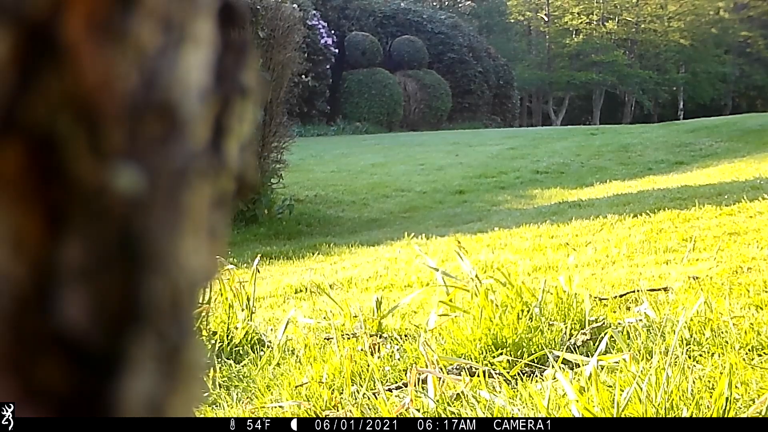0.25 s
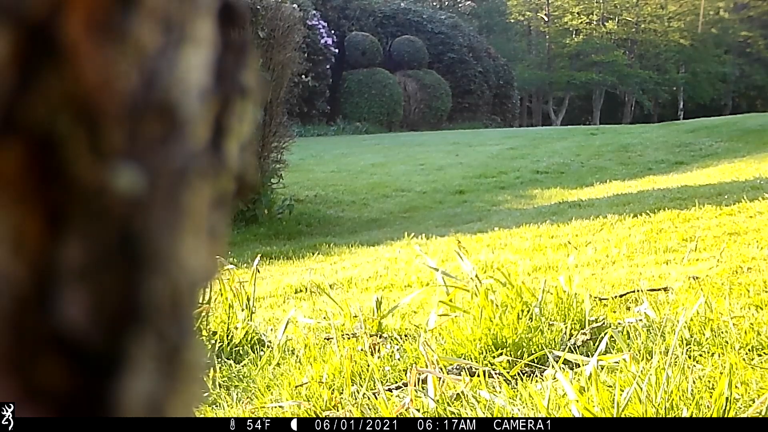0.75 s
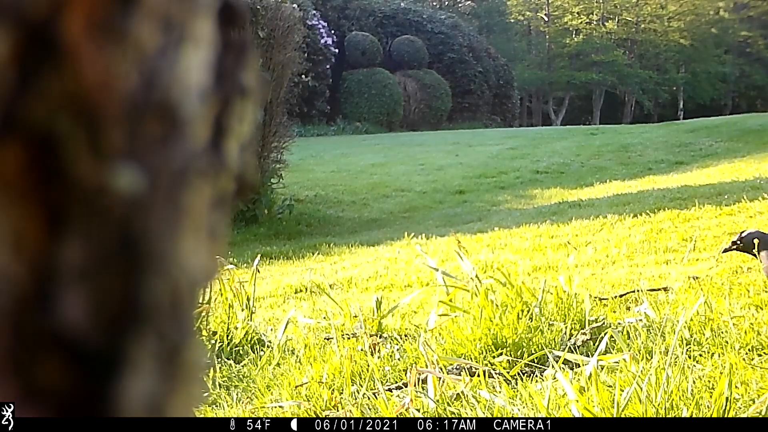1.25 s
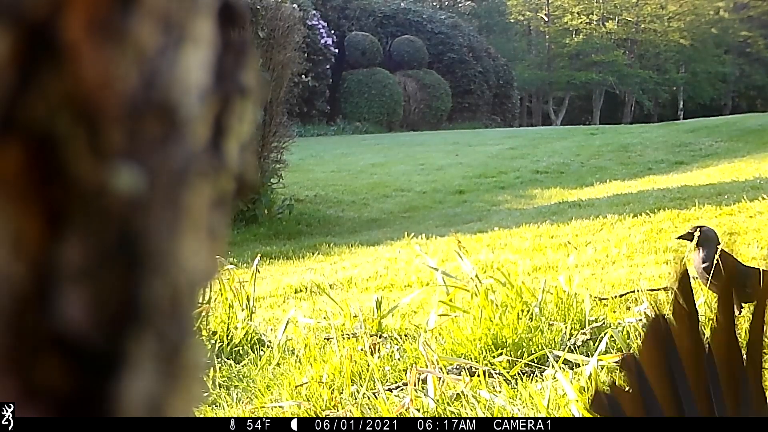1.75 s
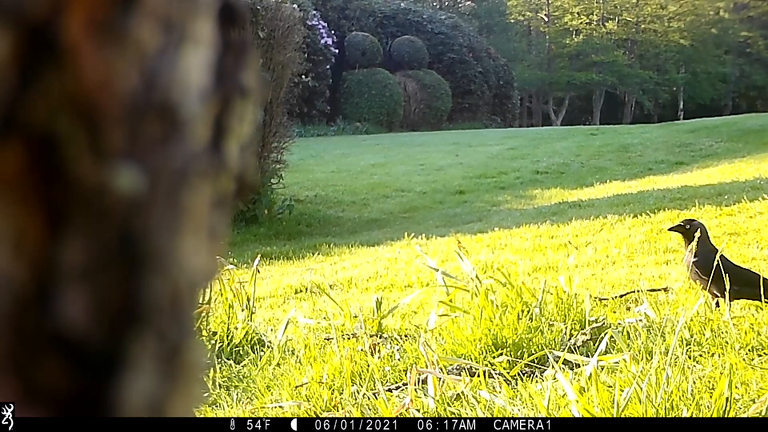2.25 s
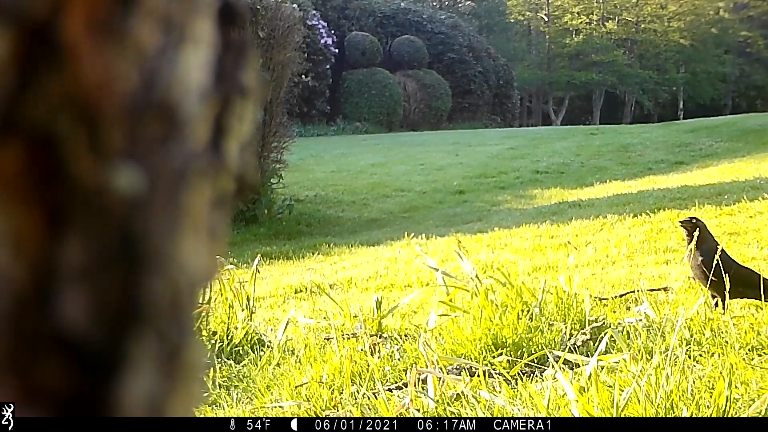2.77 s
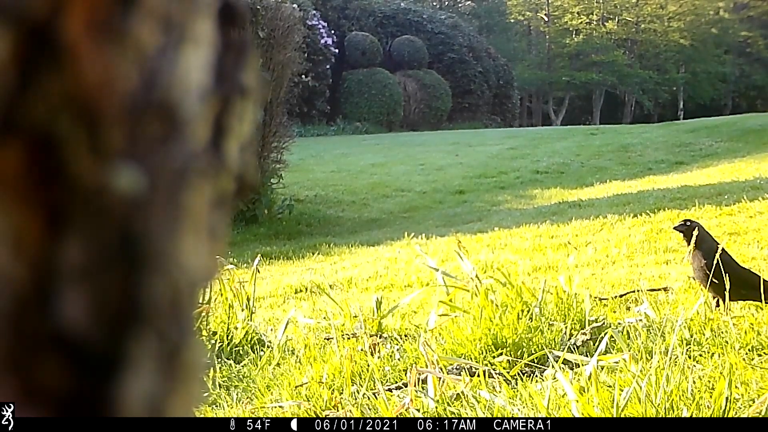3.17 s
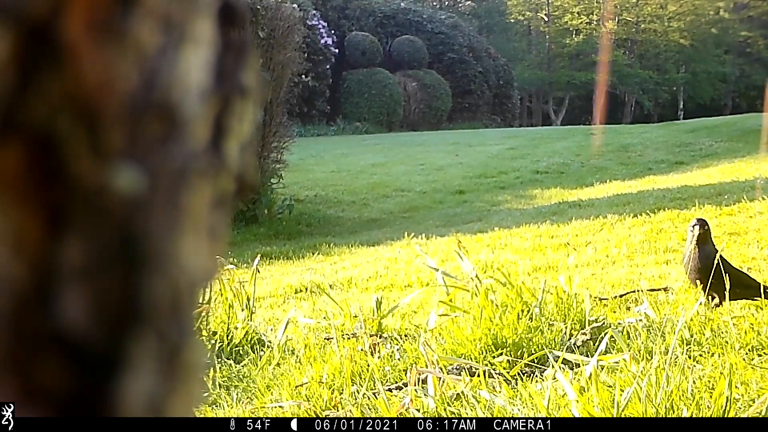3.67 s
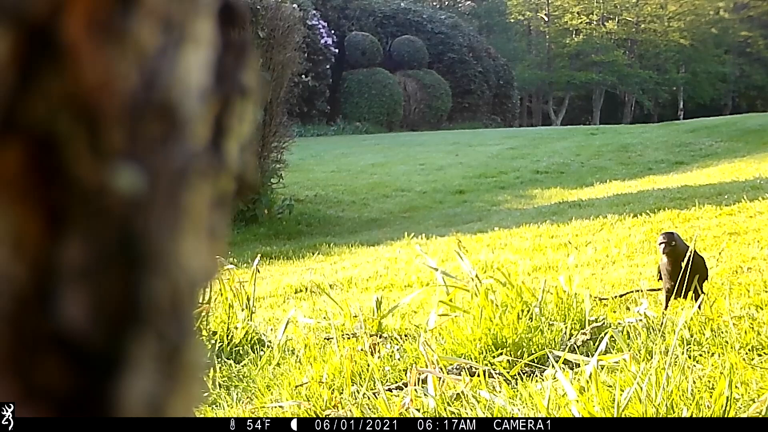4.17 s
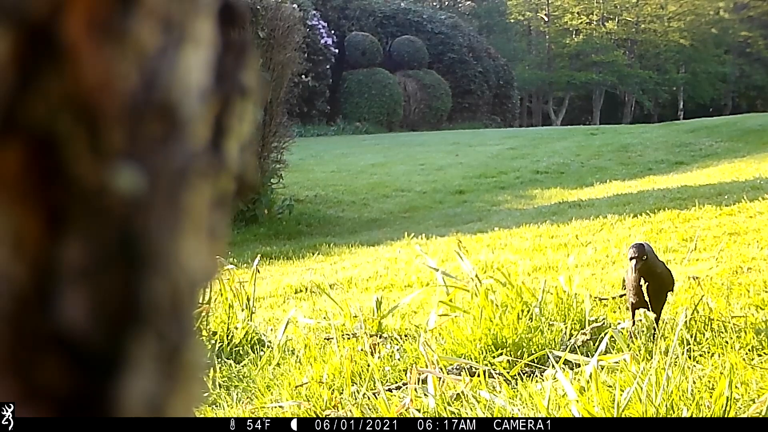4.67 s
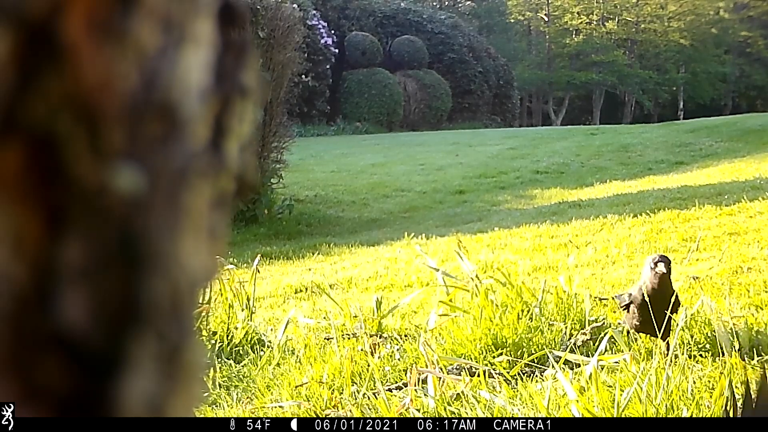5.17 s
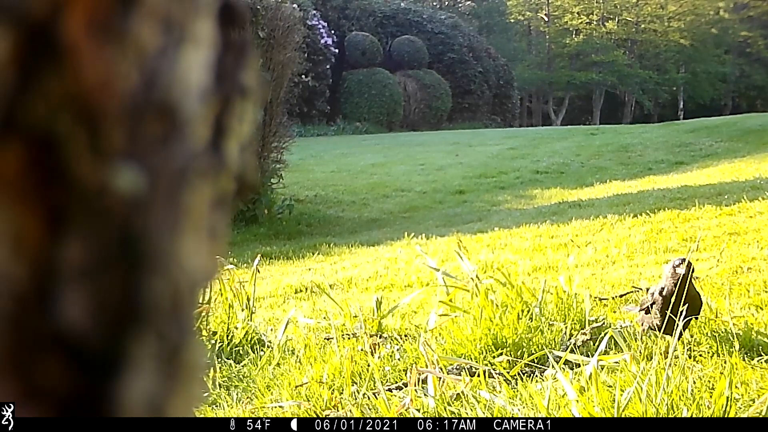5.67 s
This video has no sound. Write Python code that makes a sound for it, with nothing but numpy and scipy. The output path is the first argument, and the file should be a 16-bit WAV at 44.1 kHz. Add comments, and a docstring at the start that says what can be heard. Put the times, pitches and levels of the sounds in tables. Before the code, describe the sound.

Jackdaws on an open garden lawn give short, sharp calls that drop in pitch, very near a small outdoor microphone. Feathers rustle and wings push low thumps of air, mostly in the first two and a half seconds. Around the middle, louder calls crack into low rasps and two soft breathy hisses follow. Later the clear calls are more spaced out, with a small flutter near the end over steady hiss.

```python
"""Jackdaws squabble on a lawn, right beside the microphone of a trail camera: sharp "tchak" calls that
fall in pitch, some cracking into a lower rasp, all built from voiced pulses shaped by a throat filter;
two breathy threat hisses are noise through an open beak.
Wings, feathers and four breathy clucks are grainy noise, strong in the high treble; wings push low air.
Behind them lie dry ticks on the housing, a faint garden echo, far whistles and a steady hiss."""
import sys
import numpy as np
from scipy import signal
from scipy.fft import rfft, irfft, next_fast_len
from scipy.io import wavfile
from scipy.ndimage import uniform_filter1d, map_coordinates

SR = 44100
rng = np.random.default_rng(int(sys.argv[2]) if len(sys.argv) > 2 else 0)


def transcribe(signal):
    """Save signal, clipped to [-1, 1], as a 16-bit WAV file at the path in sys.argv[1]."""
    frames = np.atleast_2d(signal).T
    limited = np.clip(frames, -1, 1)
    pcm = np.round(limited * 32767).astype(np.int16)
    wavfile.write(sys.argv[1], SR, pcm)


N = 261072
TIME = np.arange(N) / SR
TOP_HZ = 16200  # band limit of the voices and of the camera


def amp(db):
    """Decibels to gain."""
    return 10 ** (np.asarray(db) / 20)


def unit(x):
    """Scale to rms 1."""
    return x / np.sqrt(np.mean(x ** 2) + 1e-20)


def along(points, hz):
    """(f/Hz, value) points read on a log frequency axis."""
    f, v = np.transpose(points)
    return np.interp(np.log(hz + 1), np.log(f + 1), v)


def level(rows):
    """Gain per sample from (t/s, level/dB) rows, -120 dB outside them."""
    return amp(np.interp(TIME, *np.transpose(rows), left=-120, right=-120))


def swell(t, rise):
    """A rounded attack from 0 to 1."""
    return np.sin(np.pi / 2 * np.clip(t / rise, 0, 1))


def wobble(rate, size):
    """A smooth random curve, rate knots a second."""
    knots = rng.standard_normal(int(size * rate / SR) + 4)
    return map_coordinates(knots, [np.arange(size) * rate / SR])


def wobbles(rate, count, size):
    """count unrelated smooth random curves, rate knots a second."""
    span = next_fast_len(size + 512)
    knots = rng.standard_normal((count, int(span * rate / SR) + 2))
    return signal.resample(knots, span, axis=1)[:, :size]


def filtered(x, response):
    """x times a response of frequency."""
    m = next_fast_len(len(x) + 8192)
    return irfft(rfft(x, m) * response(np.fft.rfftfreq(m, 1 / SR)), m)[:len(x)]


def resonate(x, gain_db, size=1024):
    """Causal minimum-phase filter with the given dB response: it rings only after each pulse."""
    cepstrum = irfft(np.log(amp(gain_db(np.fft.rfftfreq(size, 1 / SR)))))
    cepstrum[1:size // 2] *= 2
    cepstrum[size // 2 + 1:] = 0
    return signal.fftconvolve(x, irfft(np.exp(rfft(cepstrum))))


def noise(spectrum):
    """Coloured noise of rms 1."""
    return unit(filtered(rng.standard_normal(N), lambda hz: amp(along(spectrum, hz))))


def add(track, s, sound):
    """Mix a sound in at time s."""
    part = track[max(round(s * SR), 0):][:len(sound)]
    part += sound[:len(part)]


# Clear calls close by: t/s, length/s, start f/Hz, end f/Hz,
# bend (1 = even fall, higher = holds first, then drops), level/dB, swell/s,
# tone colour/dB: chest, beak, bright, top
CLEAR_CALLS = [(0.362, 0.074, 983, 458, 3, -37.5, 0.028, 2.5, 6.5, 4.5, 0.5),
               (0.651, 0.074, 1118, 566, 1.64, -36.5, 0.02, 0.5, 0.5, 4.5, 3.5),
               (0.978, 0.069, 1120, 524, 1.4, -36, 0.021, -3.5, 4.5, -1.5, -10),
               (1.015, 0.067, 1050, 582, 1.2, -31.5, 0.015, -4.5, 1, -6.5, -15),
               (1.352, 0.064, 897, 544, 2.55, -48.5, 0.013, 0.5, -11.5, -28, -14.5),
               (1.503, 0.057, 1045, 753, 1, -51, 0.012, 14.5, -5, 0, -0.5),
               (1.54, 0.04, 832, 684, 3.8, -50, 0.0043, 15.5, 14, -33, -12),
               (1.682, 0.084, 1100, 583.5, 1.5, -31.5, 0.011, 0.5, -1.5, -7.5, -7.5),
               (2.181, 0.067, 980, 547, 1.65, -36, 0.0048, 0.5, 6, -4, -8.5),
               (2.994, 0.08, 1128, 372, 1.91, -32, 0.0017, -2.5, -10, -2.5, 5),
               (3.487, 0.112, 1113, 433.5, 1.17, -37.5, 0.024, 3.5, -6, 7, 7.5),
               (3.497, 0.035, 923, 808, 1, -49.5, 0.005, 6.5, -12, -4, -4),
               (3.667, 0.067, 1037, 743, 1.25, -46, 0.0075, 1.5, 8, -4, 10),
               (3.748, 0.08, 900, 473, 2.8, -43, 0.035, -5.5, 1.5, -17, -0.5),
               (4.571, 0.054, 1103, 475, 1.7, -43, 0.0021, 2.5, -7.5, 5, 11.5),
               (4.827, 0.061, 1143, 469, 1.7, -33.5, 0.0035, -6, -12.5, -4.5, 8),
               (5.289, 0.073, 1043, 349, 2.6, -30.5, 0.0067, -10, -4.5, -4, -0.5),
               (5.547, 0.086, 1114, 427, 1.95, -34.5, 0.026, -1, -2.5, 9.5, 5.5),
               (5.705, 0.062, 1051, 669, 0.95, -54.5, 0.033, 9.5, -7, -9, 8.5),
               (5.834, 0.079, 1113, 321, 1.7, -28.5, 0.0088, -11.5, -11.5, -0.5, -0.5)]
FADE_DB_PER_OCTAVE = 25  # pitch and loudness sink together as the air runs out
CLEAR_ROUGH, CLEAR_CLOSE_S = 0.05, 0.0048  # roughness of a loud clear voice (0-1); how fast it shuts off
FULL_DB, SOFT_FALTERS = -35, 0.6  # below this level a call falters: dB of roughness per dB
LEAD_S, LEAD_DB = 0.01, -28  # length of the soft peep; its level relative to the call
LEAD_FROM, LEAD_TO = 1.0, 1.1  # peep pitch over the call's start pitch


def tchaks():
    """A clear call is a soft rising peep, then one falling glide that fades as it falls."""
    out, lead = np.zeros(N), np.linspace(0, 1, num=int(LEAD_S * SR))
    for s, length, start_hz, end_hz, bend, db, rise, *colour in CLEAR_CALLS:
        peep_hz = start_hz * (LEAD_FROM + (LEAD_TO - LEAD_FROM) * lead)
        peep_gain = amp(db + LEAD_DB) * lead * swell(1 - lead, 0.12)
        add(out, s - LEAD_S, peep_gain * np.sin(2 * np.pi * np.cumsum(peep_hz) / SR))

        t = np.arange(int(length * SR)) / SR
        pitch = start_hz - (start_hz - end_hz) * (t / length) ** bend
        effort = swell(t, rise) * amp(FADE_DB_PER_OCTAVE * np.log2(pitch / start_hz))
        effort = amp(db) * effort / effort.max()
        rough = CLEAR_ROUGH * amp(SOFT_FALTERS * max(FULL_DB - db, 0))
        add(out, s, utter(pitch, effort, rough, CLEAR_CLOSE_S, *colour))
    return out


# Hoarse calls close by: t/s at the top pitch, scoop/s, clear part/s, rasp/s, top f/Hz, rasp start f/Hz,
# level/dB, rasp level/dB, rasp roughness (0-1), tone colour/dB: chest, beak, bright, top
HOARSE_CALLS = [(2.063, 0.013, 0.024, 0.09, 1320, 779, -27, -40.5, 0.38, -2, 6.5, 7.5, 9.2),
                (2.431, 0.0005, 0.033, 0.044, 1161, 775, -28, -43, 0.65, -10.5, -4.5, -2, 0.88),
                (2.771, 0.018, 0.018, 0.092, 1250, 643, -32, -48, 0.3, -22, -2.5, 3, 7.3),
                (3.204, 0.012, 0.021, 0.1, 1394, 802, -23.5, -39, 0.45, -7.5, 0.5, -3, 1)]
SCOOP_FROM, SCOOP_DB = 0.83, -18.5  # a soft lead-in rises from this share of the top pitch
SAG_OCTAVES_PER_S = 16  # fall of the clear part
RASP_END_HZ, RASP_SINK_S, RASP_FADE_DB = 260.8, 0.038, 28.5  # the rasp sinks towards this pitch and fades
RASP_FRAYS = 0.55  # share of its roughness that a rasp lacks at its start and gains by its end


def hoarse_calls(rise=0.011, head_fade_db=10, head_rough=0.12, crack_s=0.0012, overlap=0.006, close=0.0029):
    """A forced call scoops up to its top, sags, then cracks into a low rasp that sinks and dies."""
    out = np.zeros(N)
    for s, scoop, clear, rasp, top_hz, rasp_hz, db, rasp_db, rough, *colour in HOARSE_CALLS:
        # clear head, with t = 0 at the top pitch
        t = np.arange(-int(scoop * SR), int((clear + overlap) * SR)) / SR
        pitch = top_hz * np.where(t < 0, SCOOP_FROM ** (-t / scoop), 2 ** (-SAG_OCTAVES_PER_S * t))
        scoop_effort = amp(SCOOP_DB) * swell(t + scoop, rise)
        sag_effort = swell(t, rise) * amp(-head_fade_db * (t / clear) ** 2)
        effort = amp(db) * np.maximum(scoop_effort, sag_effort)
        add(out, s - scoop, utter(pitch, effort, head_rough, overlap, *colour))

        # rasp after the crack
        t = np.arange(int(rasp * SR)) / SR
        pitch = RASP_END_HZ + (rasp_hz - RASP_END_HZ) * np.exp(-t / RASP_SINK_S)
        effort = swell(t, crack_s) * amp(rasp_db - RASP_FADE_DB * (t / rasp) ** 2)
        fraying = rough * (1 + RASP_FRAYS * (2 * t / rasp - 1))
        add(out, s + clear, utter(pitch, effort, fraying, close, *colour))
    return out


# Response of the throat: f/Hz, level/dB
THROAT_RESPONSE = [(100, -42), (400, -6.5), (620, -12), (800, -11), (1050, -9.5), (1400, -3.5),
                   (2000, -2.5), (2750, -9), (3450, -25), (4100, -25.5), (5500, -24), (8000, -25.5),
                   (10500, -13.5), (14000, -13.5), (16000, -32.5)]
# Where each tone colour acts, f/Hz: bottom, chest, gullet, main resonance, beak, valley, bright, top
COLOUR_CENTRES = [450, 1100, 1450, 1900, 2900, 7000, 10500, 14000]


def utter(pitch, effort, rough, close, chest, beak, bright, top, ripple_db=3, ripple_hz=450,
          overshoot=0.27, settle=0.0015, valley_share=0.54, chest_share=0.25, gullet_db=14, sag_db=10):
    """One stretch of voice through the throat, coloured by the beak's opening and direction."""
    t = np.arange(len(pitch)) / SR
    sharp = 1 + overshoot * np.exp(-t / settle)  # the first cycles start sharp
    release = np.clip((t[-1] - t) / close, 0, 1)
    voice = effort * release * syrinx(pitch * sharp, t / t[-1], np.clip(rough, 0, 1))

    # a rasp rings lower in the gullet and loses its fundamental
    gullet = chest / 2 + gullet_db * np.mean(rough)
    bottom = chest_share * chest - sag_db * np.mean(rough)
    colour_db = [bottom, chest, gullet, 0, beak, valley_share * bright, bright, top]
    colour = list(zip(COLOUR_CENTRES, colour_db))

    def ripple(hz):
        """Reflections off trunk and housing ripple the treble differently in every stretch of voice."""
        bumps = map_coordinates(rng.standard_normal(len(hz)), [hz / ripple_hz])
        return np.minimum(hz / 4500, 1) ** 2 * bumps

    return resonate(voice, lambda hz: along(THROAT_RESPONSE, hz) + along(colour, hz) + ripple_db * ripple(hz))


JITTER, BREATH = 0.022, 0.45  # pitch unrest and air noise of a fully rough voice
WAVER, BREAK_DB = 0.003, 6.5  # pitch unrest of a clear voice; swing of each overtone in a fully rough one


def syrinx(pitch, u, rough, relax=3.18, flutter_db=4.0, scatter=0.91, dull_db=30, edge_db=10,
           edge=0.0034, hum_db=9):
    """Pulses that brighten as the call takes hold and dull as it relaxes; roughness unsettles them."""
    n = len(u)
    unsteady = 1 + (WAVER + JITTER * rough) * wobble(220, n)
    phase = 2 * np.pi * np.cumsum(pitch * unsteady) / SR
    count = int(TOP_HZ / pitch.min()) + 1
    k = np.arange(1, count + 1)[:, None]  # partial number
    height = np.minimum(k * pitch / 10000, 1)

    # a clear call relaxes towards its bare fundamental; a rasp stays bright
    relaxed = u ** relax * np.maximum(1 - 2 * rough, 0)
    onset_db = edge_db * np.exp(-np.arange(n) / SR / edge)
    tilt_db = hum_db * relaxed * (k == 1) - height * (dull_db * relaxed + onset_db)

    # the two sides of the syrinx interfere, so each partial swells and slips on its own
    swell_db = (flutter_db * height + BREAK_DB * rough * (k > 1)) * wobbles(130, count=count, size=n)
    slip = scatter * (height ** 2 + 2 * rough) * wobbles(170, count=count, size=n)
    partials = amp(swell_db + tilt_db) * np.cos(k * phase + slip)
    pulses = np.sum((k * pitch < TOP_HZ) * partials, axis=0)

    # air noise puffs once per cycle
    puffs = unit((1 + np.cos(phase)) ** 2 * rng.standard_normal(n)) * np.sqrt(SR / 2 / pitch / 2)
    return pulses + BREATH * rough * puffs


# Two threat hisses, one list of rows each: t/s, level/dB
HISS_LEVELS = [
    [(2.605, -99), (2.635, -70), (2.75, -62), (2.84, -62.5), (2.9, -74.5), (3.1, -87)],
    [(3.145, -86.5), (3.175, -68), (3.28, -68), (3.35, -74.5), (3.45, -86.5), (3.5, -83)],
]
# Resonances of the open beak: f/Hz, width/Hz, level/dB
BEAK_MODES = [(1037, 32, 1.5), (1700, 190, -15.5), (3280, 360, -10.5), (3400, 92, -13), (3920, 130, 0)]


def hisses():
    """A stream of air through an open beak, unvoiced: noise through resonances that swells and fades."""
    def beak(f):
        """Sum of resonances with alternating sign."""
        total = 0
        for k, (centre, width, db) in enumerate(BEAK_MODES):
            damping = 1j * f * width
            total = total + (-1) ** k * amp(db) * damping / (centre * centre - f * f + damping)
        return total

    air = unit(filtered(rng.standard_normal(N), beak))
    return sum(level(rows) for rows in HISS_LEVELS) * air


# Wing beats close to the microphone: t/s, level/dB, stroke/s
WING_BEATS = [(0.069, -56.5, 0.025), (0.352, -56, 0.023), (0.728, -52, 0.01), (0.822, -41, 0.0086),
              (0.936, -49, 0.0025), (0.974, -45, 0.012), (1.242, -61, 0.011), (1.459, -49, 0.012),
              (1.639, -45, 0.0093), (1.76, -49.5, 0.008), (1.857, -47.5, 0.014), (2.092, -58, 0.028),
              (2.191, -53.5, 0.011), (2.537, -56.5, 0.0053), (2.79, -66, 0.022), (4.878, -64, 0.0092),
              (4.965, -61.5, 0.0064), (5.25, -51, 0.012)]
# Restless air between the beats: t/s, level/dB
BREEZE_LEVELS = [(0, -70.5), (0.6, -70.5), (1.05, -59.5), (1.35, -65), (2.0, -56.5), (2.45, -67),
                 (3.1, -77), (3.55, -60.5), (3.95, -73.5), (5.92, -69.5)]
# Spectrum of the eddies: f/Hz, relative level/dB per Hz
EDDY_SPECTRUM = [(8.8, -23), (15, 11.5), (34, -9.5), (46, -7), (81, -19.5), (119, -24), (284, -34.5),
                 (400, -42.5), (520, -43), (880, -120)]
EDDY_S, THUMP_DB = 0.032, 7  # how long the air swirls round a beat; its pressure dip over the eddies


def wing_beats():
    """A down-stroke sucks air from the port, a dip between two soft crests, and stirs slow eddies."""
    stir, thumps = level(BREEZE_LEVELS) ** 2, np.zeros(N)
    for s, db, stroke in WING_BEATS:
        stir += amp(db) ** 2 * np.exp(-((TIME - s) / EDDY_S) ** 2)
        spread = ((TIME - s) / stroke) ** 2
        thumps -= amp(db + THUMP_DB) * (1 - spread) * np.exp(-spread / 2)
    eddies = noise(EDDY_SPECTRUM)
    # dividing by the running strength evens out the eddies before they follow the stir
    strength = np.sqrt(np.abs(uniform_filter1d(eddies ** 2, size=SR // 10)) + 0.019)
    return np.sqrt(stir) * eddies / strength + thumps


# Bouts of feather and grass rustle, with four brief, breathy clucks at 3.099, 3.382, 3.861 and 5.036 s:
# t/s at the height, rise/s, fall/s, level/dB
RUSTLES_AND_CLUCKS = [(0.05, 0.11, 0.2, -60.5), (0.25, 0.17, 0.15, -57), (0.73, 0.077, 0.058, -48),
                      (0.92, 0.29, 0.27, -58.5), (1.6, 0.26, 0.11, -46), (1.9, 0.15, 0.3, -61.5),
                      (2.12, 0.095, 0.14, -51), (2.33, 0.15, 0.2, -63), (2.7, 0.13, 0.47, -67.5),
                      (3.099, 0.024, 0.084, -68), (3.382, 0.047, 0.056, -65), (3.861, 0.041, 0.027, -62),
                      (4.19, 0.15, 0.29, -75), (5.036, 0.022, 0.02, -60.5), (5.24, 0.098, 0.11, -58),
                      (5.45, 0.56, 0.48, -70.5)]
# Spectrum of feathers at the microphone, its small port strong in the high treble:
# f/Hz, relative level/dB per Hz
FEATHER_SPECTRUM = [(120, -44), (200, -7), (851, -12), (1060, -13.5), (1180, -12), (1420, -16.5),
                    (2910, -17.5), (5420, -21.5), (7270, -18), (12600, 5), (15100, 2), (16000, -8)]
RUFFLE_DROP_DB, STIR_DB = 13, -81.5  # drop over a rise or fall time; the grass between bouts


def feathers_and_clucks(grain_db=2.0, stroke_db=2, shuffle_db=4.0):
    """Barbs scrape in tiny clumped grains that build up and die; the same noise makes the clucks."""
    bouts = []
    for s, rise, fall, db in RUSTLES_AND_CLUCKS:
        away = np.maximum((s - TIME) / rise, (TIME - s) / fall)
        bouts.append(amp(db - RUFFLE_DROP_DB * away))
    effort = np.maximum(np.max(bouts, axis=0), amp(STIR_DB)) * amp(shuffle_db * wobble(24, N))
    grains = rng.standard_normal(N) * amp(grain_db * wobble(900, N) + stroke_db * wobble(70, N))
    return effort * unit(filtered(grains, lambda hz: amp(along(FEATHER_SPECTRUM, hz))))


# Feather flicks: t/s, starting level/dB, time to fall 60 dB/s
FEATHER_FLICKS = [(0.389, -38.5, 0.046), (0.714, -42, 0.015), (0.732, -52, 0.027), (0.749, -41, 0.05),
                  (0.809, -43.5, 0.068), (0.932, -40, 0.017), (1.514, -32.5, 0.022), (1.602, -61, 0.012),
                  (1.964, -48.5, 0.048), (2.407, -44, 0.011)]


def flicks(rise=0.0001):
    """A quill catches and lets go: a short dry burst of feather noise."""
    out, t = np.zeros(N), np.arange(SR // 10) / SR
    for s, db, t60 in FEATHER_FLICKS:
        add(out, s, amp(db - 60 * t / t60) * (1 - np.exp(-t / rise)))
    return out * noise(FEATHER_SPECTRUM)


# Wing tips brush past: t/s, length/s, level/dB, centre f/Hz
WING_SWISHES = [(0.153, 0.12, -65.5, 7000), (0.695, 0.039, -56, 1160), (0.745, 0.017, -57.5, 1070),
                (0.784, 0.03, -68, 500), (1.403, 0.15, -75, 890), (1.9, 0.073, -72.5, 7600)]


def swishes(width=0.93):
    """A passing wing tip: a short swell of broad noise, width in octaves."""
    out = np.zeros(N)
    for s, length, db, hz in WING_SWISHES:
        air = rng.standard_normal(int(length * SR))
        air = unit(filtered(air, lambda f: np.exp(-(np.log2((f + 1) / hz) / width) ** 2 / 2)))
        add(out, s, amp(db) * air * np.hanning(len(air)))
    return out


# Dry ticks on the housing: t/s, peak level/dB
HOUSING_TICKS = [(1.513, -41.5), (3.947, -51), (4.396, -47.5)]


def ticks(t60=0.0022):
    """Something small and hard touches the plastic: a broadband crack that dies at once."""
    out, t = np.zeros(N), np.arange(SR // 50) / SR
    for s, db in HOUSING_TICKS:
        crack = rng.standard_normal(len(t)) * amp(-60 * t / t60)
        add(out, s, amp(db) * crack / np.abs(crack).max())
    return out


# Decay of the garden echo: f/Hz, time to fall 60 dB/s
GARDEN_DECAY = [(300, .5), (2000, 0.93), (5000, 0.57), (12000, 0.082)]


def garden(x, delay=0.038):
    """The far hedge and trees give a dull answer: a delayed noise tail that dies sooner in the treble."""
    hz, t, z = signal.stft(rng.standard_normal(SR), SR, nperseg=256)
    t60 = np.maximum(along(GARDEN_DECAY, hz), .02)[:, None]
    tail = signal.istft(z * amp(-60 * t / t60), SR, nperseg=256)[1]
    late = np.pad(x, (int(delay * SR), 0))
    return signal.fftconvolve(late, tail / np.linalg.norm(tail))[:N]


# Far songbirds: t/s, length/s, start f/Hz, end f/Hz, level/dB
FAR_WHISTLES = [(1.083, 0.27, 2030, 1755, -82), (4.718, .14, 3120, 2820, -91)]


def songbirds():
    """Thin, far whistles: wavering sines that sink a little."""
    out = np.zeros(N)
    for s, length, start_hz, end_hz, db in FAR_WHISTLES:
        n = int(length * SR)
        pitch = np.linspace(start_hz, end_hz, n) * (1 + 0.03 * wobble(130, n))
        envelope = np.sqrt(2 * np.hanning(n))
        add(out, s, amp(db) * envelope * np.sin(2 * np.pi * np.cumsum(pitch) / SR))
    return out


# Spectrum of the steady background: f/Hz, relative level/dB per Hz
FLOOR_SPECTRUM = [(12, -45), (20, -2.5), (48, -14), (120, -21), (337, -30), (759, -33.5), (825, -31.5),
                  (1610, -36.5), (1760, -35.5), (2020, -34.5), (3630, -38.5), (4180, -39), (16000, -39.5)]


def microphone_hiss(db=-76):
    """The microphone's steady noise, heaviest in the deep bass."""
    return amp(db) * noise(FLOOR_SPECTRUM)


def scene(garden_db=-47):
    """Birds close by, their faint echo, wings, ticks, far songbirds and the microphone's steady hiss."""
    birds = tchaks() + hoarse_calls() + hisses()
    echo = amp(garden_db) * garden(birds)
    rustles = wing_beats() + feathers_and_clucks() + flicks() + swishes()
    background = songbirds() + microphone_hiss()
    return (birds + echo + rustles + ticks() + background)[None]


def record(dry):
    """The camera keeps nothing above its band limit."""
    return filtered(dry[0], lambda hz: hz < TOP_HZ)[None]


dry = scene()
out = record(dry)
transcribe(out)
```